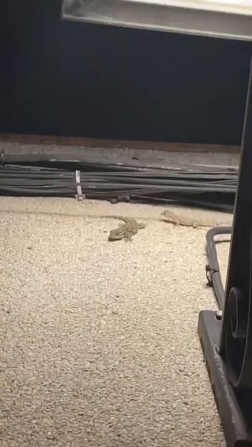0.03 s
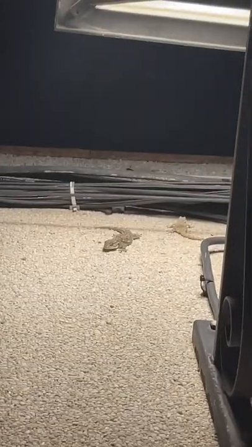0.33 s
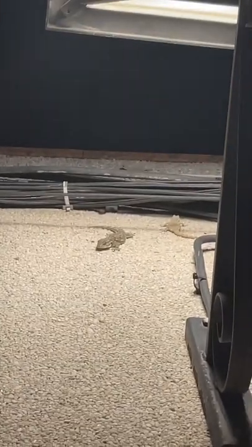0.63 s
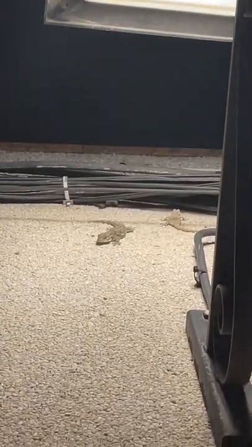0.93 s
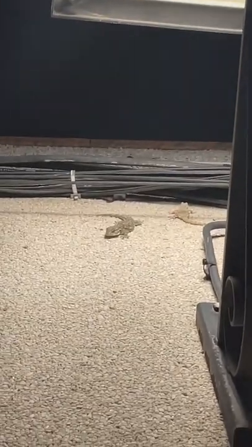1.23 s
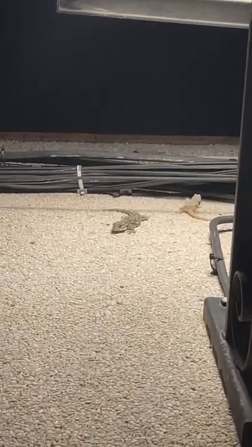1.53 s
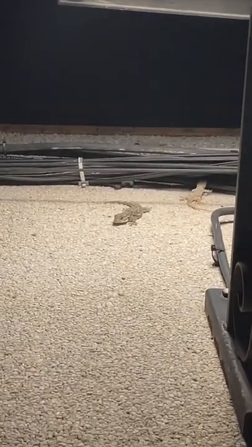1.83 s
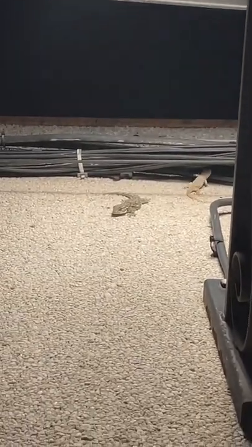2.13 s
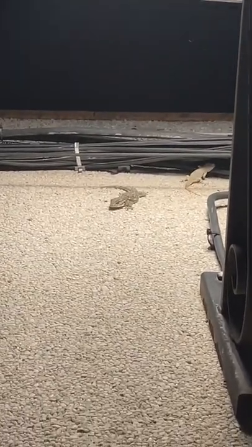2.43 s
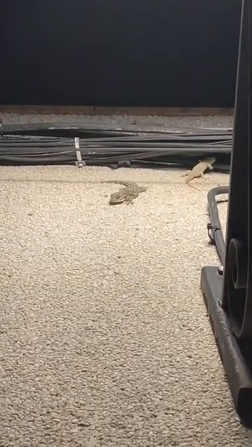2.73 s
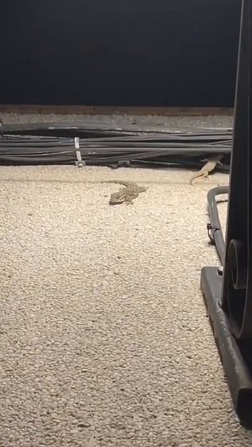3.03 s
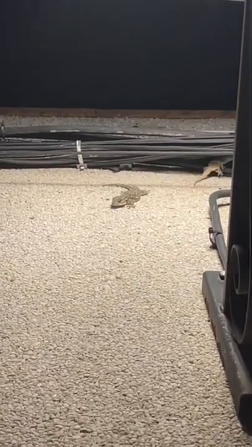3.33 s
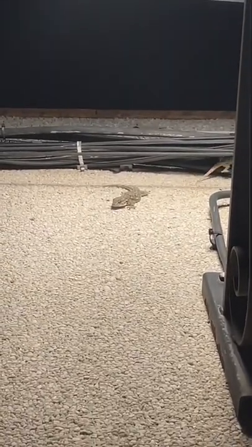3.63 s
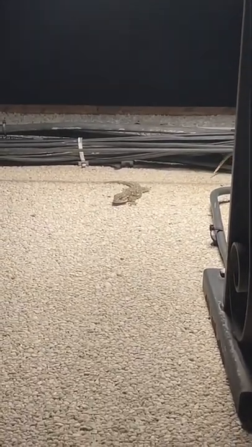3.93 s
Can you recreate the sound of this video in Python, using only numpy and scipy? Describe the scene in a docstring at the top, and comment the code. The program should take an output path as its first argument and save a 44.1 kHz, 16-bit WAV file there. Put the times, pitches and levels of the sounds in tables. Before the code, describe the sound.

Ventilation and distant traffic make a quiet, even hiss, with faint low microphone bumps.

```python
"""Steady ventilation hiss, mixed with distant traffic, fills a quiet spot by an outside wall.
Echoes from the wall ripple the hiss, and a fan adds a faint hum and whine.
A hand-held phone picks it up through two ports (its microphone openings). Shifts of the grip reach
both as soft, dull bumps over a low rumble, and a light breeze flutters and pops across them."""
import sys
import numpy as np
from scipy import signal
from scipy.fft import rfft, irfft
from scipy.io import wavfile
from scipy.ndimage import map_coordinates

SR = 44100
rng = np.random.default_rng(int(sys.argv[2]) if len(sys.argv) > 2 else 0)


def bounce(signal):
    """Save signal as a 16-bit WAV file at the path given by the first command-line argument."""
    frames = np.transpose(np.atleast_2d(signal))
    limited = np.clip(frames, -1, 1)
    pcm = np.round(limited * 32767).astype(np.int16)
    wavfile.write(sys.argv[1], SR, pcm)


N = 176400  # 4 seconds

# strength of the breeze on the ports: time_s, level_db
BREEZE_LEVELS = [(0, -66), (.1, -68), (.14, -79), (.4, -80), (.5, -61.5), (.8, -72.5), (.9, -79),
                 (1.15, -74), (1.25, -60), (1.52, -63), (1.6, -82), (2.6, -73), (3.05, -84.5), (3.2, -68),
                 (3.45, -65), (3.6, -80), (3.7, -66), (4, -61.5)]
# small puffs of air: centre_s, length_s, level_db, pitch_hz
AIR_PUFFS = [(0.024, 0.013, -54, 497), (.07, 0.02, -54, 260), (.435, 0.011, -56, 220),
             (0.503, .008, -46, 300), (0.558, .014, -52, 242), (0.605, 0.0072, -58, 420),
             (.712, .008, -59, 300), (0.75, .01, -52, 190), (0.812, .005, -58, 330), (1.01, .006, -57, 600),
             (1.028, .006, -51, 520), (1.248, .008, -52, 280), (1.35, .006, -56, 270),
             (1.499, 0.0033, -45, 420), (1.827, .007, -52, 450), (2.052, .01, -55, 477),
             (2.086, 0.0067, -53, 480), (2.351, .006, -56, 300), (2.447, .014, -57, 179),
             (3.155, .003, -44, 617), (3.349, 0.0022, -42, 716), (3.529, .006, -51, 190),
             (3.899, 0.0027, -47, 650)]
# shifts of the grip: centre_s, length_s, thud_db, knock_db, thud_pitch_hz
GRIP_BUMPS = [(0.021, 0.029, -45, -53.5, 70.6), (0.182, 0.016, -35, -43.5, 96),
              (0.202, 0.012, -41, -42.5, 115), (0.225, 0.022, -32.5, -51, 78), (0.306, 0.032, -51, -66, 60),
              (0.345, 0.023, -42, -68, 61.4), (0.458, 0.018, -48.5, -46.5, 80),
              (0.509, 0.023, -39, -42, 65), (0.547, 0.0056, -42, -41, 99), (0.679, 0.032, -47.5, -59, 66),
              (0.742, 0.018, -47.5, -52.5, 61.5), (0.8, 0.022, -49.5, -72, 55),
              (0.894, 0.03, -49.5, -63, 80), (0.935, 0.021, -48, -52.5, 114), (0.97, 0.015, -40, -51, 82),
              (1.005, 0.016, -50.5, -48, 120), (1.029, 0.032, -39, -56.5, 54.6),
              (1.099, 0.018, -49.5, -66, 72), (1.128, 0.022, -49, -68, 60), (1.534, 0.018, -49.5, -65, 66),
              (1.7, 0.053, -57, -62.5, 62), (2.08, 0.03, -40.5, -42, 57.7), (2.14, 0.014, -48.5, -65, 62.4),
              (2.273, 0.042, -55, -73, 58), (2.46, 0.026, -51.5, -55, 61.6), (2.864, 0.0075, -50, -58, 85),
              (3.129, 0.02, -51.5, -57.5, 95), (3.169, 0.018, -52.5, -58.5, 85),
              (3.299, 0.014, -40.5, -58, 82.5), (3.319, 0.019, -37.5, -40.5, 105.5),
              (3.336, 0.019, -35, -58, 59), (3.523, 0.015, -44, -53, 80), (3.563, 0.017, -50.5, -66, 62),
              (3.745, 0.02, -51, -61.5, 66)]
# low rumble of the hand: time_s, level_db
RUMBLE_LEVELS = [(0, -59), (.12, -63.5), (.27, -57.5), (.6, -57), (1.12, -52), (1.2, -60), (2, -60.5),
                 (2.3, -57), (2.7, -63.5), (3.2, -63), (3.45, -55), (3.7, -61.5), (4, -68)]
# faint tones of the fan and motor: pitch_hz, level_db, width_hz, left_lead_rad
FAN_TONES = [(73.9, -69.5, 3.1, -0.41), (286.2, -78, 17, -1), (453.4, -79, 5, -0.7),
             (499.5, -79, 4.4, -1.4), (526, -80.5, 7.9, -0.21), (1050, -83.5, 9.7, -1.5),
             (1438, -89.5, 17, 0.81), (1478, -83.5, 13, -0.46), (1928, -88.5, 26, 0.36),
             (2030, -93, 19, 0.1), (2474, -88.5, 52, 0.33), (2904, -86.5, 55, 0.99), (3216, -92, 62, 0.95),
             (3570, -93.5, 18, -0.25), (4540, -91.5, 32, 0.28), (4700, -92, 59, 0.13), (4920, -97.5, 35, 1),
             (5190, -96, 26, 0.79), (6450, -94, 66, 1.5)]
# the fan's hum: time_s, level_db
HUM_LEVELS = [(0, -76), (.25, -77), (.55, -70.5), (1.15, -72.5), (1.48, -81), (1.82, -73), (2.3, -74),
              (2.75, -78.5), (3.25, -71), (3.5, -78.5), (4, -74)]
# the motor's whine: time_s, level_db
WHINE_LEVELS = [(0, -86), (.65, -89.5), (.84, -85.5), (1.1, -89.5), (2.5, -89), (2.85, -94), (3.3, -86),
                (4, -90)]
# the thinner whine above it: time_s, level_db
THIN_WHINE_LEVELS = [(0, -101), (1.5, -97.5), (1.95, -89), (2.7, -94), (2.9, -85), (3.2, -99), (4, -92)]
# echoes from the wall and eaves: delay_s, level_db
WALL_ECHOES = [(.0047, -18.5), (.0068, -16), (0.0144, -15.5)]
# swell of the hiss's treble: time_s, gain_db
TREBLE_SWELL = [(0, -0.2), (.2, -0.4), (.32, 0.7), (.5, -.4), (1.3, .5), (1.7, -.5), (2.2, 0.2), (2.38, .9),
                (2.6, 0), (3.25, 1.5), (4, 0.4)]
# ventilation and traffic noise, from bass to treble: pitch_hz, level_db_per_hz
HISS_SPECTRUM = [(20, -90), (35, -82), (55, -78), (90, -84), (150, -82.5), (240, -90.5), (370, -88.5),
                 (470, -91), (650, -94), (1100, -96.5), (1400, -99.8), (1680, -104.6), (2000, -102.8),
                 (2250, -105), (2900, -104), (4150, -114), (4750, -110.7), (5550, -113.8), (6700, -115.3),
                 (7500, -113), (8700, -121.5), (10300, -125), (12000, -135)]
# how that noise compares at the two ports: pitch_hz, likeness_0_to_1, left_lead_rad, left_minus_right_db
HISS_STEREO = [(48.7, 1, 1.5, -2.5), (89, .82, 0, 1.5), (152, 0.7, 0, -0.3), (290, 0.45, 0.4, -1.1),
               (543, 0.43, -1, -3), (840, 0.3, -1.05, -2.5), (1210, 0.3, -0.9, -2.5),
               (1480, 0.27, 0.64, -0.4), (2050, 1, 0.82, -0.7), (2840, 0.84, 0.75, 0),
               (3630, 1, -0.46, 0.5), (4860, 1, -0.9, -1), (5450, 0.96, 1, 0.5), (7330, .92, 2, 0),
               (9350, 1, 2.5, 0)]
# slow swell of the whole hiss: time_s, gain_db
HISS_SWELL = [(0, -0.5), (.35, 0.7), (.9, 0.7), (1.6, -0.7), (2.6, -0.43), (3.2, -0.07), (4, -0.3)]


def gain(db):
    """Turn decibels into a number to multiply by."""
    return 10 ** (np.asarray(db) / 20)


def over_time(table):
    """Join (time_s, level_db) points into a gain for every sample."""
    time_s, level_db = np.array(table).T
    return gain(np.interp(np.arange(N) / SR, time_s, level_db))


def pitches():
    """The frequency in Hz of each slot in a spectrum."""
    return np.maximum(np.arange(N // 2 + 1) * SR / N, 1)


def over_pitch(table):
    """Spread each column after pitch_hz over the spectrum, joining points along an octave scale."""
    pitch_hz, *columns = np.array(table).T
    return [np.interp(np.log(pitches()), np.log(pitch_hz), column) for column in columns]


def white_spectrum():
    """The spectrum of fresh white noise."""
    return rfft(rng.standard_normal(N))


def unit_level(sound):
    """Scale to an average (rms) level of 1."""
    return sound / np.sqrt(np.mean(sound ** 2))


def wander(rate_hz):
    """A smooth random curve with a typical size of 1."""
    return unit_level(irfft(white_spectrum() * np.exp(-(pitches() / rate_hz) ** 2), N))


def noise_band(pitch_hz, octaves, top_hz):
    """Noise gathered around one pitch, falling away steeply above top_hz."""
    bell = np.exp(-(np.log2(pitches() / pitch_hz) / octaves / 2) ** 2)
    treble_cut = np.sqrt(1 + (pitches() / top_hz) ** 10)
    return unit_level(irfft(white_spectrum() * bell / treble_cut, N))


def burst(noise, centre_s, length_s, level_db):
    """Fade a noise quickly in and out, reaching level_db in the middle."""
    distance = (np.arange(N) / SR - centre_s) / length_s
    near = abs(distance) < 2
    swell = np.exp(-2 * distance[near] ** 2)
    sound = np.zeros(noise.shape)
    sound[..., near] = gain(level_db) * unit_level(swell * noise[..., near]) * np.sqrt(np.mean(swell ** 2))
    return sound


def breeze():
    """Light air flutters and pops on the ports; the right wave is the left one upside down."""
    octaves, top_hz, flutter_db = 0.48, 1600, 3.5
    flutter = noise_band(pitch_hz=188, octaves=octaves, top_hz=top_hz) * over_time(BREEZE_LEVELS)
    flutter *= gain(flutter_db * wander(rate_hz=23))
    puffs = sum(burst(noise_band(pitch_hz, octaves, top_hz), centre_s, length_s, level_db)
                for centre_s, length_s, level_db, pitch_hz in AIR_PUFFS)
    return np.array([flutter + puffs, -flutter - puffs])


def case_noise(pitch_hz, octaves, side_db):
    """The hand and case pass only low sound; side_db sets the small part that differs between ports."""
    shared, side = (noise_band(pitch_hz, octaves, top_hz=373) for _ in range(2))
    return unit_level(np.array([shared + gain(side_db) * side, shared - gain(side_db) * side]))


def wobble(bumps):
    """The phone shakes briefly after each bump, like a spring coming to rest."""
    pitch_hz, fade_s, level_db = 56.4, 0.036, -12.5
    t = np.arange(N) / SR
    ring = np.exp(-t / fade_s) * np.sin(2 * np.pi * pitch_hz * t) * 2 / (fade_s * SR)
    return gain(level_db) * signal.fftconvolve(bumps.mean(axis=0), ring)[:N]


def handling():
    """Each shift of the grip makes a low thud and a soft knock; a rumble runs underneath."""
    bumps = np.zeros((2, N))
    for centre_s, length_s, thud_db, knock_db, thud_pitch_hz in GRIP_BUMPS:
        thud = case_noise(thud_pitch_hz, octaves=0.27, side_db=-32)
        knock_hz = 159.5 * (0.02 / length_s) ** 0.2  # shorter knocks sound higher
        knock = case_noise(knock_hz, octaves=0.4, side_db=-18)
        bumps += burst(thud, centre_s, length_s, thud_db) + burst(knock, centre_s, length_s, knock_db)
    rumble = case_noise(pitch_hz=57.3, octaves=0.45, side_db=-26.5) * over_time(RUMBLE_LEVELS)
    return bumps + wobble(bumps) + rumble


def tone(pitch_hz, width_hz, left_lead_rad, steadiness=0.18):
    """A wavering tone made of narrow noise; steadiness 0 lets it fade freely, 1 holds its level."""
    peak = 1 + (2 * (pitches() - pitch_hz) / width_hz) ** 2
    wave = np.fft.ifft(white_spectrum() / peak, N)
    wave /= abs(wave) ** steadiness
    return unit_level(np.array([(wave * np.exp(0.5j * side * left_lead_rad)).real for side in (1, -1)]))


def fan():
    """Blades and motor give faint tones; a hum and two whines swell and fade among them."""
    faint = sum(gain(level_db) * tone(pitch_hz, width_hz, left_lead_rad)
                for pitch_hz, level_db, width_hz, left_lead_rad in FAN_TONES)
    hum = tone(pitch_hz=738.5, width_hz=5, left_lead_rad=-1, steadiness=0.8) * over_time(HUM_LEVELS)
    whine = tone(pitch_hz=5912, width_hz=52, left_lead_rad=0.4) * over_time(WHINE_LEVELS)
    thin_whine = tone(pitch_hz=7380, width_hz=70, left_lead_rad=1.7) * over_time(THIN_WHINE_LEVELS)
    return faint + hum + whine + thin_whine


def near_wall(hiss):
    """Echoes ripple the treble, shifting as the phone sways; the treble also swells on its own."""
    treble_from_hz, sway_s = 1700, 0.00004
    treble = irfft(rfft(hiss) / (1 + (treble_from_hz / pitches()) ** 8), N)
    rippled = treble.copy()
    for delay_s, level_db in WALL_ECHOES:
        read_at = np.arange(N) - (delay_s + sway_s * wander(rate_hz=0.96)) * SR
        echo = np.array([map_coordinates(port, [read_at], mode="mirror") for port in treble])
        rippled += gain(level_db) * echo
    rippled *= np.std(treble) / np.std(rippled)  # the echoes add colour, not loudness
    return hiss - treble + rippled * over_time(TREBLE_SWELL)


def ventilation_and_traffic():
    """A steady wash of noise: part reaches both ports alike, part is different at each."""
    level_db, = over_pitch(HISS_SPECTRUM)
    likeness, left_lead_rad, balance_db = over_pitch(HISS_STEREO)
    likeness = np.clip(likeness, 0, 1)
    shared, ports = white_spectrum(), []
    for side in (1, -1):  # left, then right
        alike = np.sqrt(likeness) * shared * np.exp(0.5j * side * left_lead_rad)
        scattered = np.sqrt(1 - likeness) * white_spectrum()
        colour = gain(level_db + side * balance_db / 2) * np.sqrt(SR / 2)
        ports.append(irfft((alike + scattered) * colour, N))
    drift_db = 0.61 * wander(rate_hz=3.4)
    return np.array(ports) * over_time(HISS_SWELL) * gain(drift_db)


def scene():
    """Hiss and fan all around, handling near the centre, the breeze at the sides."""
    return near_wall(ventilation_and_traffic()) + fan() + handling() + breeze()


def record(dry):
    """The phone drops the deepest bass and the highest treble."""
    low_cut_hz, high_cut_hz = 31, 9400
    thinned = irfft(rfft(dry) / np.sqrt(1 + (low_cut_hz / pitches()) ** 10), N)
    treble_cut = signal.ellip(8, 0.1, 70, high_cut_hz, fs=SR, output="sos")
    return signal.sosfiltfilt(treble_cut, thinned)


dry = scene()
out = record(dry)
bounce(out)
```